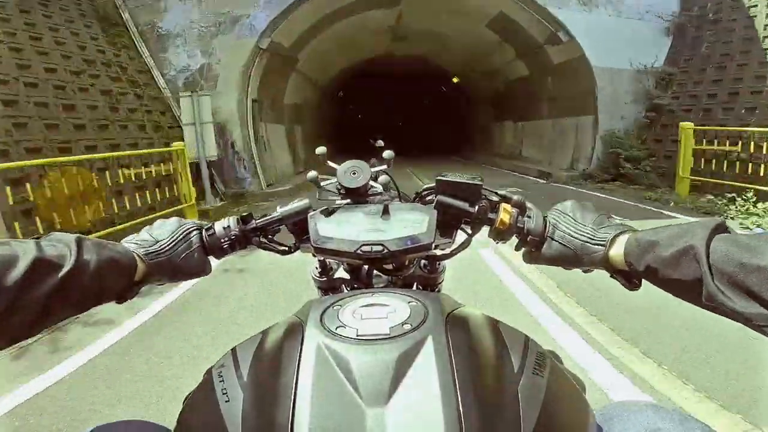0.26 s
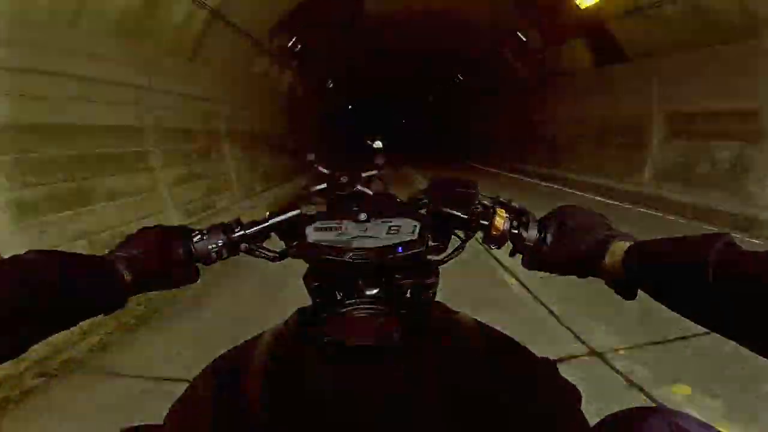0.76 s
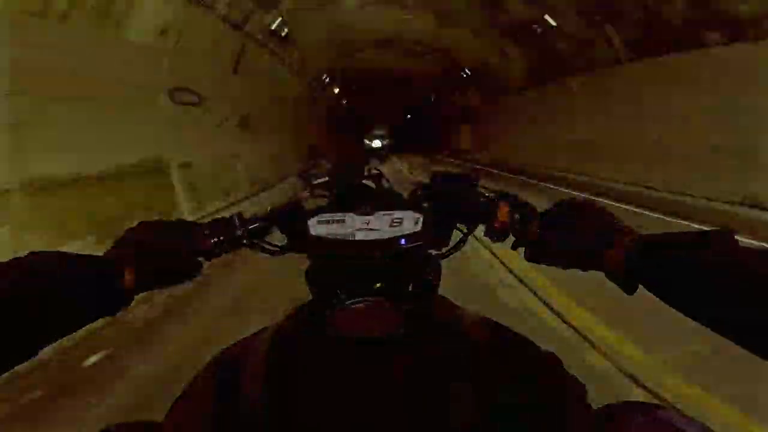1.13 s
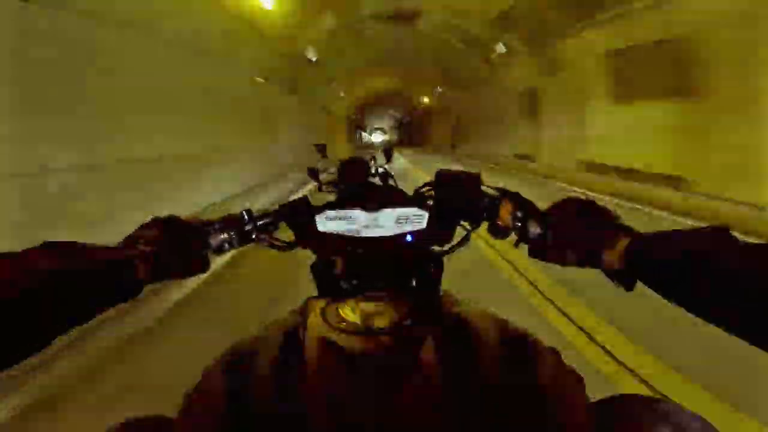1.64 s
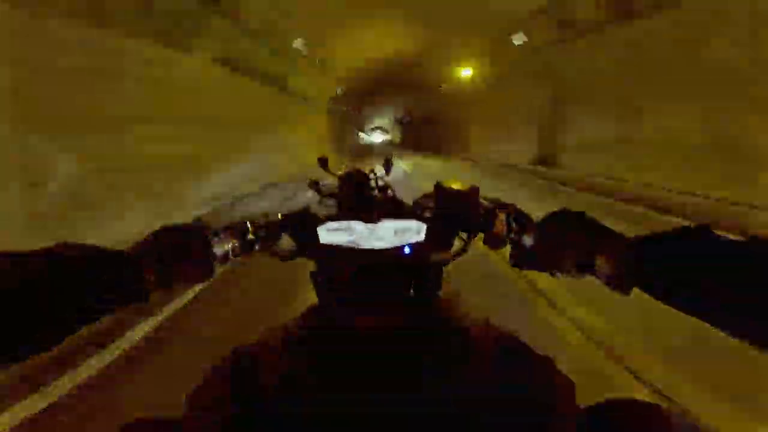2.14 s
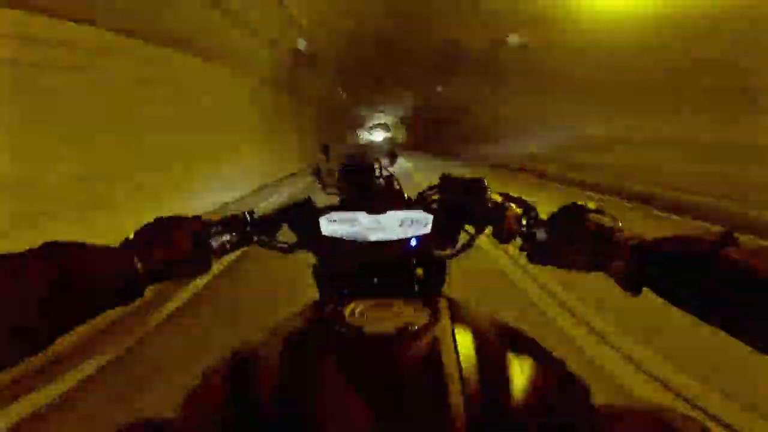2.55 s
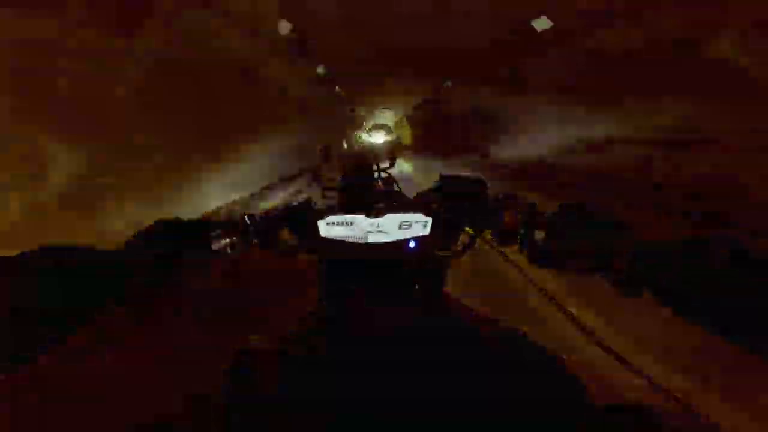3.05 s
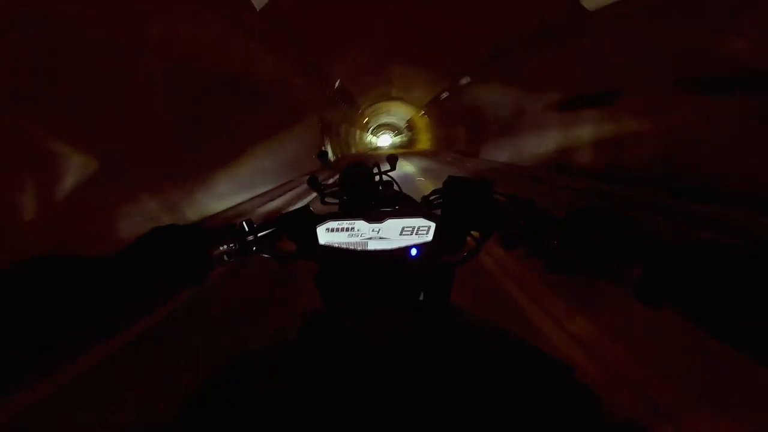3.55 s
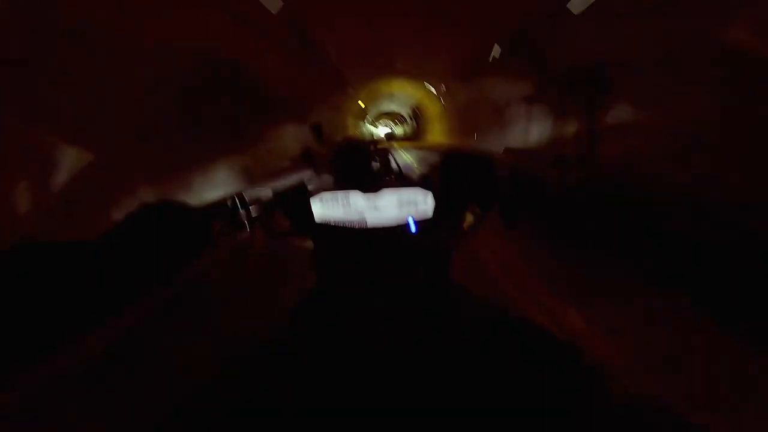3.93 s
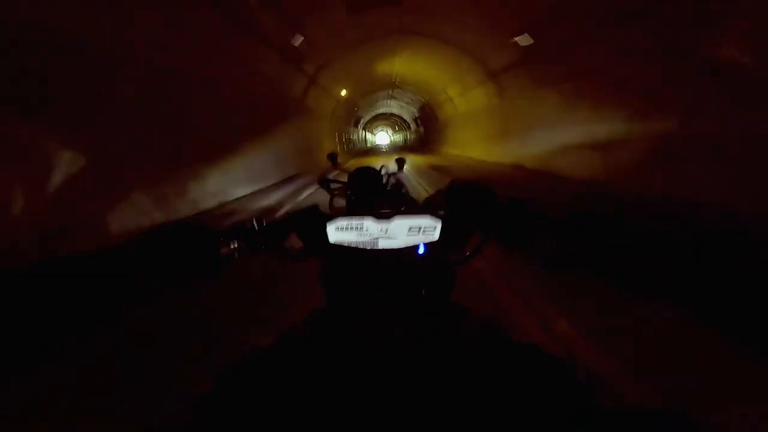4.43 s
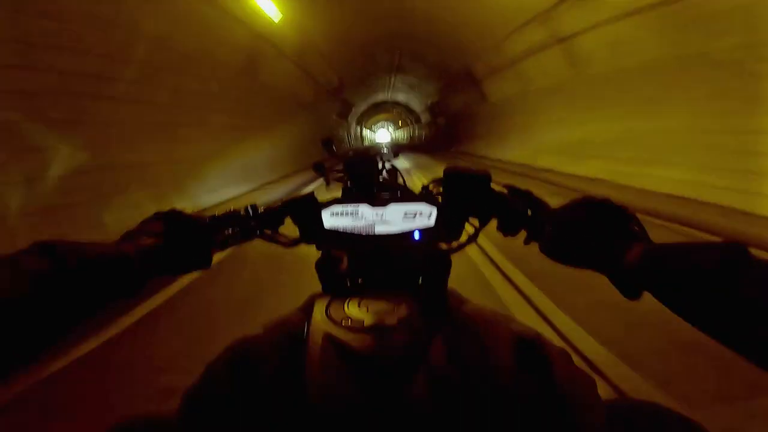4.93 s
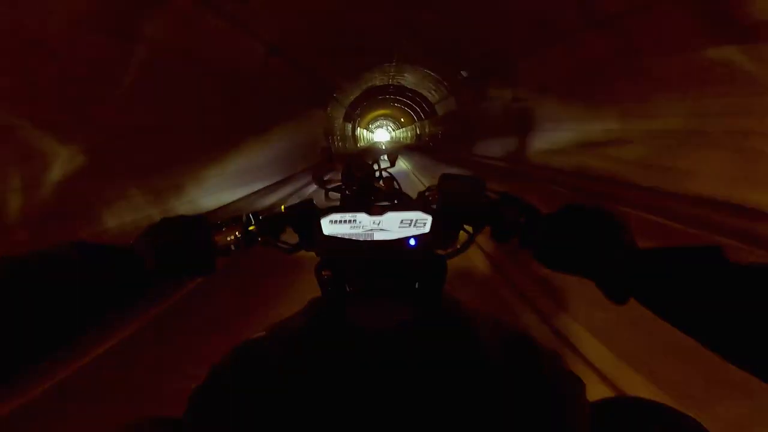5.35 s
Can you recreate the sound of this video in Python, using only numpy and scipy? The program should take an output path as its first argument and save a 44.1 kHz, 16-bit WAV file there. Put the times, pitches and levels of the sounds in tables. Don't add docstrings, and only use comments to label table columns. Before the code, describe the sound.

Close onboard motorcycle sound: a hard, pulsing twin exhaust drone pulls steadily upward, first fairly dry outdoors, then enclosed and roaring inside a tunnel. Individual tones swell and fade as walls pass. Fine metallic chatter and a thin gear whine accompany it. Wind buffets thicken in the second half, while the engine pulls louder and fuller until the sound stops still under power.

```python
import sys
import numpy as np
from scipy import signal
from scipy.fft import rfft, irfft, next_fast_len
from scipy.io import wavfile
from scipy.ndimage import map_coordinates

SR = 44100
rng = np.random.default_rng(int(sys.argv[2]) if len(sys.argv) > 2 else 0)


def attenuation_scalar(level_db):
    decades = np.asarray(level_db, float) / 20
    return 10 ** decades


def generate_wav(sig):
    pcm = np.round(np.clip(np.atleast_2d(sig).T, -1, 1) * 32767).astype(np.int16)
    wavfile.write(sys.argv[1], SR, pcm)


N = 246519

# time in seconds, engine cycles per second in Hz.
SPEED = [(0.0, 36.0), (0.6, 36.29), (0.8, 36.57), (1.4, 37.35), (1.8, 38.11), (2.2, 38.73), (2.6, 39.27),
         (3.6, 40.88), (3.8, 41.25), (4.2, 42.23), (4.8, 43.25), (5.0, 43.82), (5.4, 45.13), (5.59, 45.47)]
# time in seconds, engine load in dB.
LOAD = [
    (0.0, -33),
    (0.7, -31.5),
    (1.4, -29.5),
    (2.2, -30),
    (3.2, -29),
    (3.9, -25),
    (4.6, -25.5),
    (5.0, -22.5),
    (5.3, -21.5),
    (5.59, -22.0),
]
# centre in Hz, width in Hz, lift in dB.
EXHAUST_COLOUR = [(138.8, 14.7, 8.5), (170.6, 12.7, 8.5), (212.7, 209, -20.5), (212.5, 10.5, -8), (228.4, 67, 13.5),
                  (251.2, 6.7, -11.5), (334.8, 14, -5.5), (422.4, 64.5, -6.5), (492.2, 16, -10.5), (626, 162, -11.5),
                  (644.4, 57, 11), (726, 8.2, 11.5), (876, 60, 6.5), (902, 232, -12.5)]
# centre in Hz, width in Hz, lift in dB.
OPEN_ROAD = [(72, 21, 4.5), (412, 16, -8), (488, 59, 12), (593, 40, -10), (717, 33, 4.5), (810, 69, 5)]
# centre in Hz, width in Hz, lift in dB.
BARK = [(1100, 130, 2), (726, 56, -0.5), (200, 80, 1)]
# centre in Hz, width in Hz, level in dB.
PIPE = [(76, 92, -38.5), (197.5, 19.55, -31.0), (418.4, 42.8, -32), (674.3, 52, -50.5), (809.3, 64, -49.5),
        (1073, 190, -55), (1380, 12, -69)]
PIPE_DELAYS = (.0086, .0012, .004, .008, .0027, .0025, .0104)
# order of the engine cycle, level in dB.
PULSE = [(1.0, -9.5), (2.0, 9), (3.0, 4.5), (4.0, 29), (5.0, 4.5), (6.0, 14.5), (7.0, 15.5), (8.0, 12.5),
         (9.0, 10), (10.0, 8), (11.0, 13), (12.0, 14), (13.0, 2.5), (14.0, 2.5), (15.0, -1), (16.0, 4),
         (17.0, 11), (18.0, 9.5), (19.0, 8.5), (20.0, 24.5), (21.0, 7.5), (22.0, 7), (23.0, 10), (24.0, 4),
         (25.0, 11), (26.0, 2.5), (27.0, -2.5), (28.0, 25.5), (29.0, -4.2), (30.0, -5.5)]
# time in seconds, lift in dB, length in seconds.
RECESSES = [(.8, -1.5, 0.067), (1.45, 4, 0.051), (1.6, -5.5, 0.046), (1.71, 3, 0.07), (1.85, -1, 0.025),
            (2.22, -4.5, 0.05), (2.53, 4, 0.047), (3.9, -5, 0.037), (4.1, -4.5, 0.027), (4.26, -7, 0.033),
            (4.45, 0.5, 0.063), (5.1, -6.5, 0.11), (5.22, 3, 0.045)]
# meshes per engine cycle, level in dB at the middle speed, slope in dB per Hz of speed,
# bend in dB per Hz squared.
WHINE = [
    (25.7, -47, 0.23, -0.125),
    (38, -57.5, -0.3, 0.14),
    (50.3, -75, 0, 0.86),
]
# time in seconds, level in dB, length in seconds.
JOINTS = [
    (0.759, -33, 0.018),
    (2.578, -37, .05),
    (3.49, -43, 0.018),
]
# start in seconds, length in seconds, level in dB.
GUSTS = [(0.259, 0.029, -50), (0.316, 0.03, -44), (0.733, 0.044, -45.5), (1.374, 0.028, -49),
         (1.526, 0.032, -45.5), (1.984, 0.027, -45), (2.224, 0.03, -50), (2.483, 0.19, -44.5),
         (2.745, 0.032, -42), (3.045, 0.031, -38), (3.15, 0.14, -37), (3.404, 0.17, -42),
         (3.577, 0.03, -44.5), (3.647, 0.048, -46), (3.807, 0.12, -39.5), (3.9, 0.066, -46),
         (4.193, 0.14, -47.5), (4.35, 0.108, -43), (4.474, 0.148, -35), (4.656, 0.14, -43.5),
         (4.884, 0.136, -46.5), (5.086, 0.102, -34.5), (5.217, 0.19, -39.5), (5.393, 0.22, -41.5)]
# frequency in Hz, level in dB per Hz.
RASP = [(800, -12.5), (1100, -6.5), (1250, -10), (1400, -11.5), (1700, -16), (1880, -16.5), (2160, -21.5),
        (3000, -28), (3830, -31), (4260, -42), (4950, -41), (6500, -47), (9000, -98)]
CLATTER = [(2350, -27), (4000, -6), (4460, -7.5), (4990, -6), (6710, -15), (8050, -11.5), (9180, -17),
           (10100, -15), (11500, -20), (13000, -24.5), (14000, -23.5), (14900, -28), (15400, -40),
           (15700, -49)]
ROAR = [(30, -44.5), (60, -24.5), (150, 5), (300, 1), (420, 7), (520, 2), (640, 5), (760, -3), (900, -11.5),
        (1100, -36.5), (1500, -12), (2200, -59)]
BUFFET = [(8, -33), (25, -12), (45, -3), (70, -7.5), (150, -15.5), (300, -6.5), (600, -67.5)]
# centre in Hz, width in Hz, lift in dB.
CASES = [(1910, 25, 3.5), (3890, 35, 5.5), (4870, 200, 4), (8230, 98, 5), (9100, 82, 9.5),
         (9740, 120, 11.5), (10530, 140, 6), (13700, 400, 1.5)]
# frequency in Hz, side minus mid in dB.
WIDTH = [(35, -15.5), (65, -25.5), (110, -9.5), (200, -12), (380, -18), (700, -7), (1290, -8), (2380, -7),
         (4400, -8), (8120, -15.5), (12000, -5), (15000, -16)]
# frequency in Hz, left minus right in dB.
LEAN = [(60, -1), (110, -2.5), (200, 0.5), (380, -1.0), (700, -3), (1290, -1.5), (2380, -0.5), (4400, -0.5),
        (8120, 0.5), (15000, -3.5)]

SECOND_FIRING = 3 / 8
HOWLING = 11
PORTAL_S, ENCLOSED_S, SETTLED_S = .4, .8, 1.4
WIDE_OPEN_S = (3.3, 5.05)
MIDDLE_HZ, MIDDLE_LOAD_DB = 40.5, -28
BLOCK = 64


def exhaust(cycles):
    rate, load_db = curves(SPEED)[0][::BLOCK], curves(LOAD)[0][::BLOCK]
    t = np.arange(0, N, BLOCK) / SR
    outdoors = 1 - ramp(PORTAL_S, SETTLED_S)[::BLOCK]
    full = ramp(*WIDE_OPEN_S)[::BLOCK]
    recess_db = sum(db * np.exp(-((t - s) / length) ** 2) for s, db, length in RECESSES)
    uneven = attenuation_scalar(.5 * wobble(35))
    inside = np.interp(t, [PORTAL_S, ENCLOSED_S, *WIDE_OPEN_S], [.35, 1.2, 1.2, .6])
    mid, side = np.zeros(N), np.zeros(N)
    spin, crank = 1, np.exp(2j * np.pi * cycles)
    for order, pulse_db in PULSE:
        k = round(order)
        hz = k * rate
        pair = 1 + .9 * np.exp(-2j * np.pi * k * SECOND_FIRING)
        size = abs(pair * resonances(PIPE, hz, [0] * len(PIPE))) * attenuation_scalar(pulse_db + load_db + 32.5)
        place_db = bumps(EXHAUST_COLOUR, hz) + outdoors * bumps(OPEN_ROAD, hz) + full * bumps(BARK, hz)
        if k == HOWLING:
            place_db = place_db + recess_db
        turn = np.angle(pair * resonances(PIPE, hz, PIPE_DELAYS))
        stir = (.18 + .035 * k) * inside
        flicker = attenuation_scalar(stir * 2.4 * wobble(15, step=BLOCK))
        phase = turn + .27 * stir * wobble(14, step=BLOCK)
        wave = size * attenuation_scalar(place_db) * flicker * np.exp(1j * phase)
        side_db = along(WIDTH, hz) - 3.5 + 2.1 * wobble(12, step=BLOCK)
        side_phase = np.pi / 2 + .26 * wobble(1.2, step=BLOCK)
        across = wave * attenuation_scalar(side_db) * np.exp(1j * side_phase)
        spin = spin * crank
        mid += fine(wave.real) * spin.real - fine(wave.imag) * spin.imag
        side += fine(across.real) * spin.real - fine(across.imag) * spin.imag
    return uneven * np.array([mid + side, mid - side])


def rasp(cycles):
    steady = .6 + .55 * ramp(PORTAL_S, ENCLOSED_S) - .6 * ramp(*WIDE_OPEN_S)
    gate = bursts(cycles, lag=.2, decay=.16, floor=steady, second=.6)
    gain = loudness(level_db=-37.5, growth=.81, open_db=.33)
    return gain * rush(RASP, 2, gate=gate / (steady + .23))


def clatter(cycles):
    strength_db = np.minimum(3 * rng.exponential(size=N), 12)
    ticks = attenuation_scalar(strength_db * (rng.random(N) < .01))
    chain_db = 1.3 * np.sin(2 * np.pi * .255 * cycles + .8 * wobble(5))
    gate = bursts(cycles, lag=.3, decay=.078, floor=.98) * ticks * attenuation_scalar(chain_db)
    return loudness(level_db=-60, growth=.71, open_db=1.1) * rush(CLATTER, .5, gate=gate)


def gears(cycles):
    faster = curves(SPEED)[0] - MIDDLE_HZ
    whine = np.zeros(N)
    for teeth, db, slope, bend in WHINE:
        level_db = db + slope * faster + bend * faster ** 2 + 3.5 + 1.4 * wobble(34)
        whine += attenuation_scalar(level_db) * np.sin(2 * np.pi * teeth * cycles + .5 * wobble(25))
    return whine * np.array([[1.2], [.8]])


def roar():
    t = np.arange(N) / SR
    joints = sum(attenuation_scalar(db) * np.exp(-((t - s) / length) ** 2) for s, db, length in JOINTS)
    gain = loudness(level_db=-34, growth=.68, open_db=6.3) + joints
    return gain * attenuation_scalar(.21 * wobble(25)) * rush(ROAR, .83)


def wind():
    t = np.arange(N) / SR
    gusts = sum(attenuation_scalar(db) * np.exp(-((t - s - length / 2) / (.49 * length)) ** 2) for s, length, db in GUSTS)
    lull = attenuation_scalar(-43)
    return (lull + gusts) * attenuation_scalar(1.5 * wobble(14)) * rush(BUFFET, 1.5)


def bursts(cycles, lag, decay, floor, second=1):
    gate = np.full(N, floor)
    for start, strength in ((0, 1), (SECOND_FIRING, second)):
        since = cycles - lag - start + 1
        blows = attenuation_scalar(1.4 * rng.standard_normal(400))[since.astype(int)]
        gate += strength * blows * np.exp(-(since % 1) / decay)
    return gate


def rush(spectrum, wide_db, gate=1):
    def colour(hz):
        ring = 1 + sum((attenuation_scalar(db) - 1) / (1 + (2 * (hz - c) / w) ** 2) for c, w, db in CASES)
        widths = np.array([np.ones_like(hz), attenuation_scalar(along(WIDTH, hz) + wide_db)])
        return attenuation_scalar(along(spectrum, hz)) * ring * widths

    mid, side = filtered(gate * rng.standard_normal((2, N)), colour)
    return unit(np.array([mid + side, mid - side]))


def loudness(level_db, growth, open_db):
    load_db = growth * (curves(LOAD)[0] - MIDDLE_LOAD_DB)
    return attenuation_scalar(level_db + load_db - open_db * (1 - ramp(PORTAL_S, ENCLOSED_S)))


def resonances(modes, f, delays):
    total = 0
    for k, ((c, w, db), s) in enumerate(zip(modes, delays)):
        mode = 1j * f * w / (c * c - f * f + 1j * f * w)
        total = total + (-1) ** k * attenuation_scalar(db) * mode * np.exp(-2j * np.pi * f * s)
    return total


def bumps(bands, hz):
    return sum(db / (1 + (2 * (hz - c) / w) ** 2) for c, w, db in bands)


def ramp(start, end):
    return np.clip((np.arange(N) / SR - start) / (end - start), 0, 1)


def curves(rows):
    s, *cols = np.transpose(rows)
    return [np.interp(np.arange(N) / SR, s, c) for c in cols]


def fine(slow):
    return np.interp(np.arange(N), np.arange(len(slow)) * BLOCK, slow)


def wobble(rate, step=1):
    return map_coordinates(rng.standard_normal(200), [np.arange(0, N, step) * rate / SR])


def along(points, hz):
    f, v = np.transpose(points)
    return np.interp(np.log(hz + 1), np.log(f + 1), v)


def filtered(x, response):
    m = next_fast_len(N + 8192)
    return irfft(rfft(x, m) * response(np.fft.rfftfreq(m, 1 / SR)), m)[..., :N]


def unit(x):
    return x / np.sqrt(np.mean(x ** 2) + 1e-20)


def scene():
    cycles = np.cumsum(curves(SPEED)[0] + .02) / SR + .05
    engine = exhaust(cycles) + rasp(cycles) + clatter(cycles) + gears(cycles)
    return engine + roar() + wind()


def low_pass(x):
    return signal.sosfilt(signal.butter(12, 15730, fs=SR, output="sos"), x)


def record(dry):
    def microphones(hz):
        lean = attenuation_scalar(along(LEAN, hz) * np.array([[.5], [-.5]]))
        return lean * (hz < 15730)

    return low_pass(filtered(dry, microphones))


dry = scene()
out = record(dry)
generate_wav(out)
```